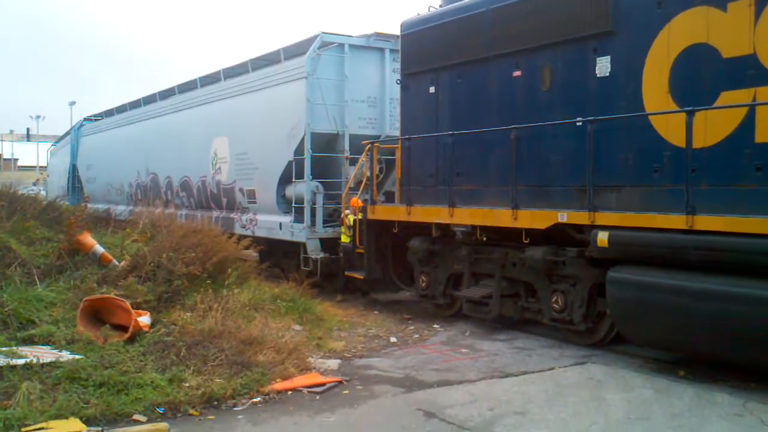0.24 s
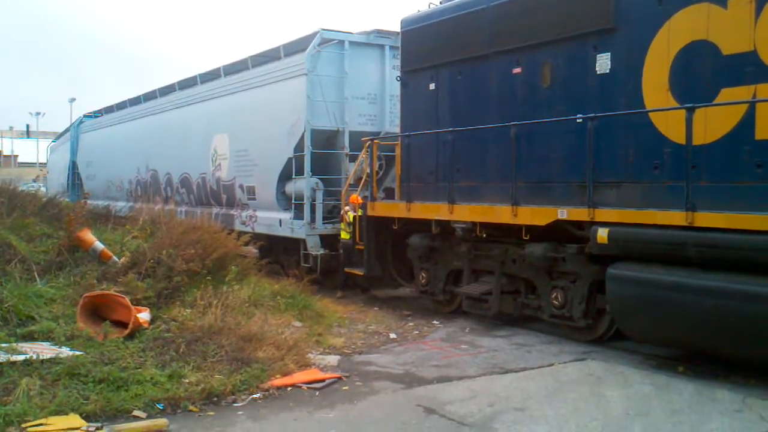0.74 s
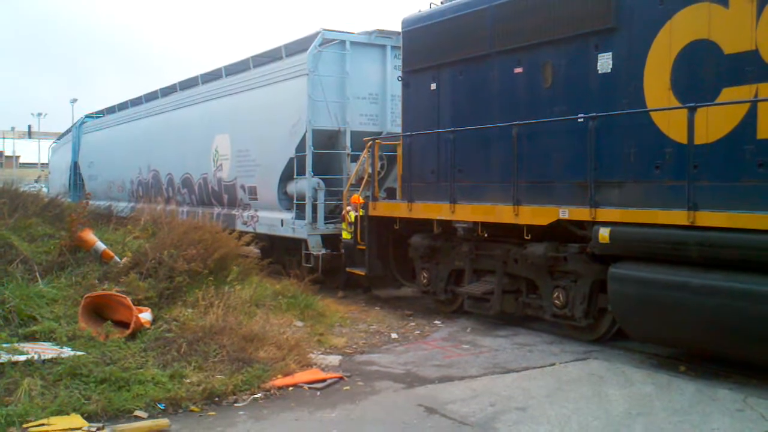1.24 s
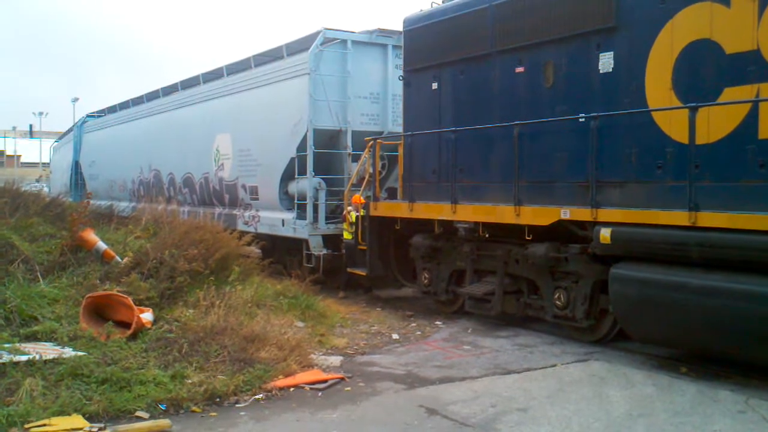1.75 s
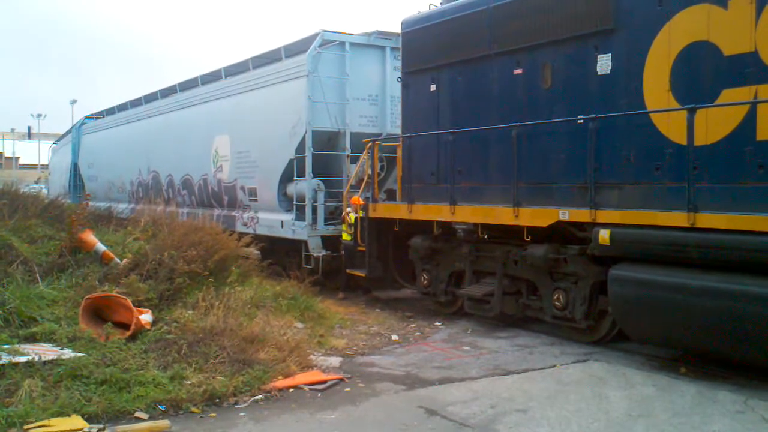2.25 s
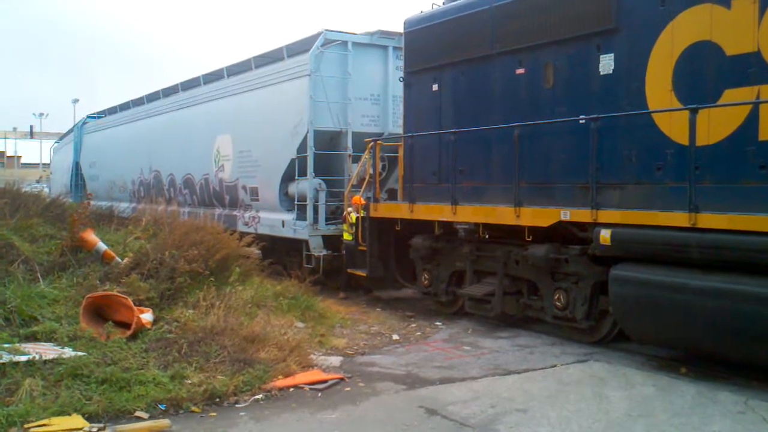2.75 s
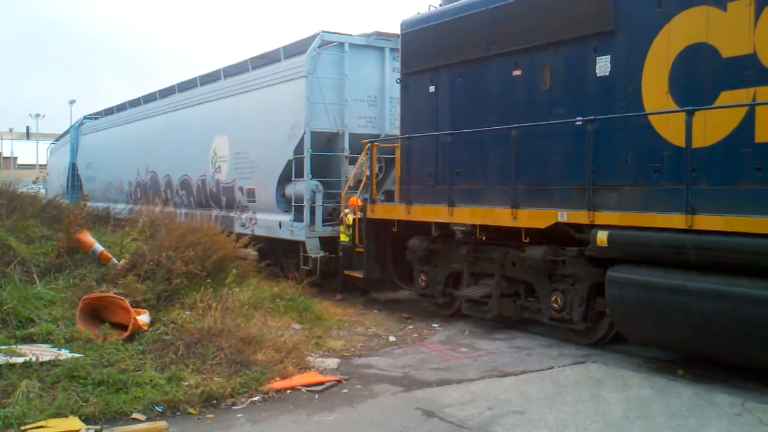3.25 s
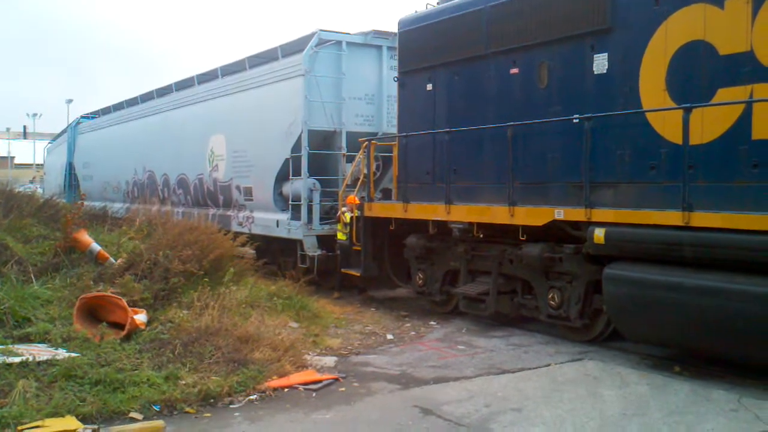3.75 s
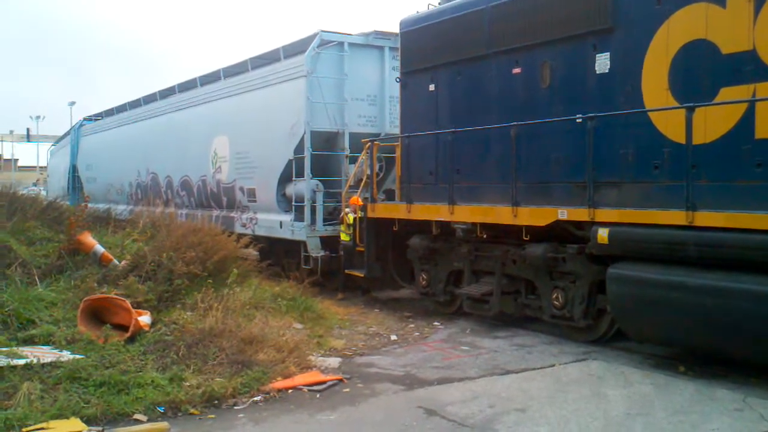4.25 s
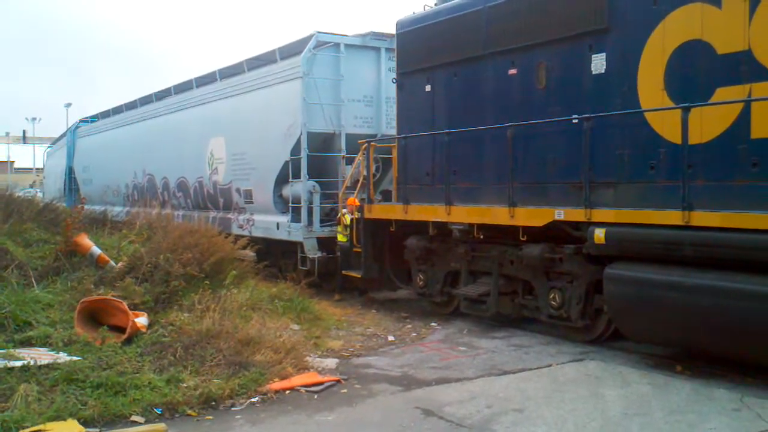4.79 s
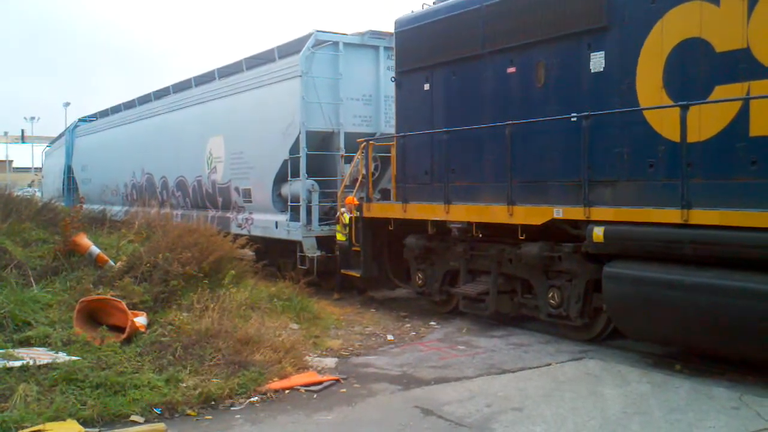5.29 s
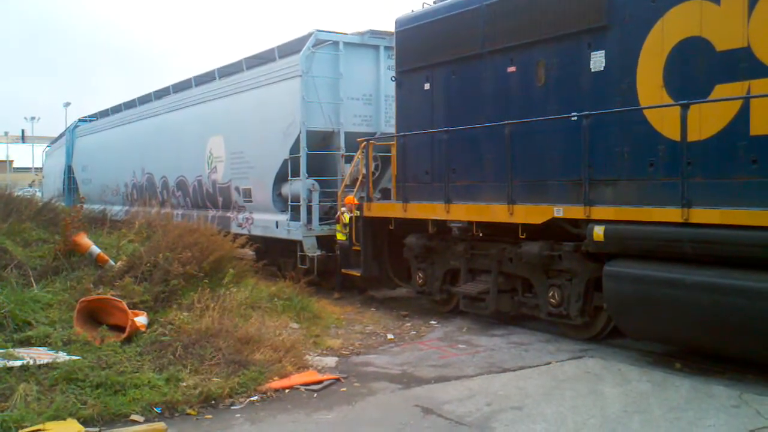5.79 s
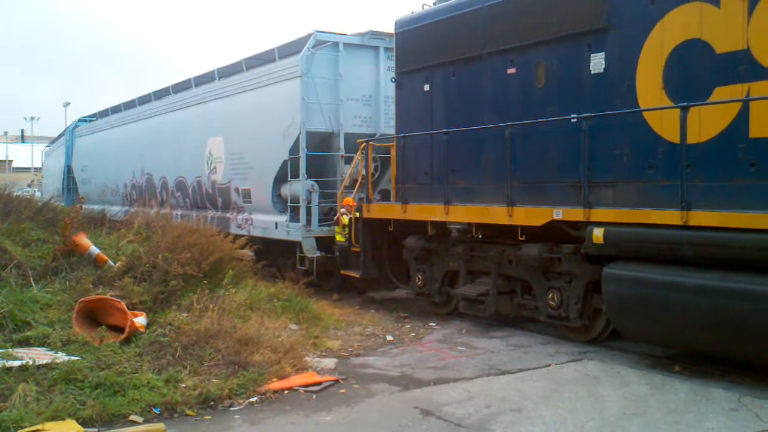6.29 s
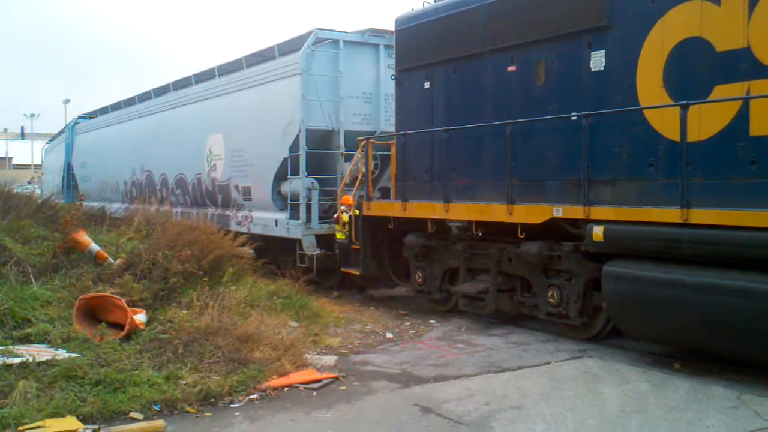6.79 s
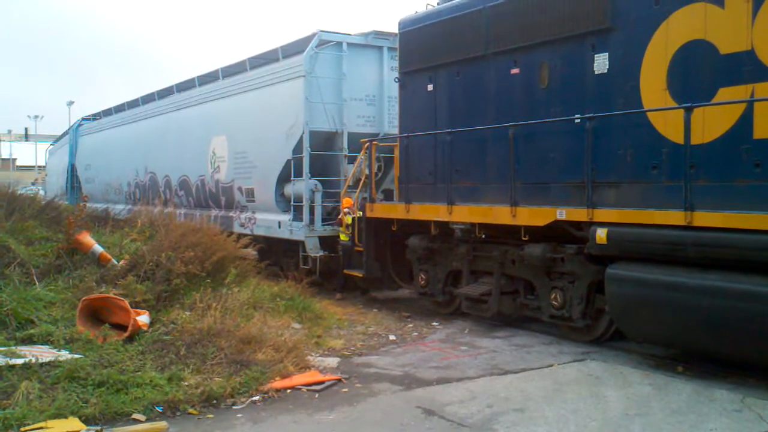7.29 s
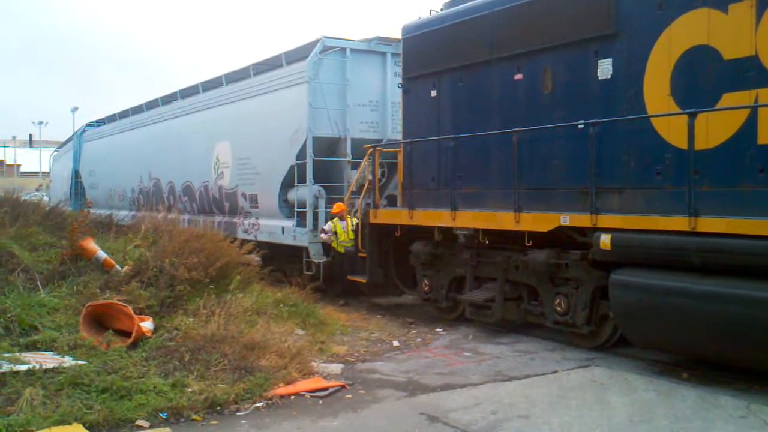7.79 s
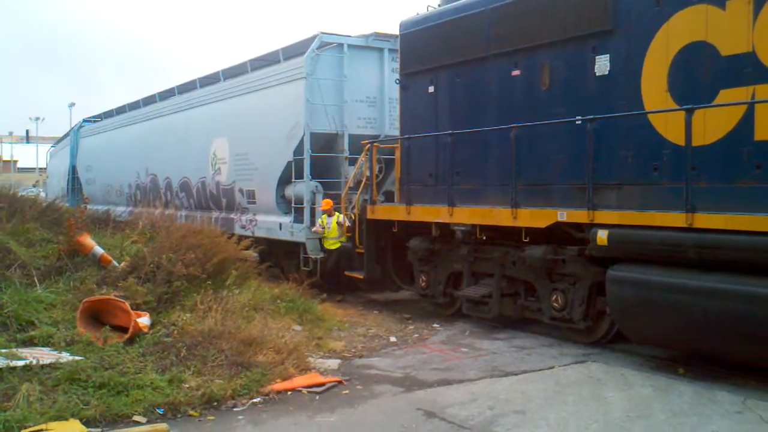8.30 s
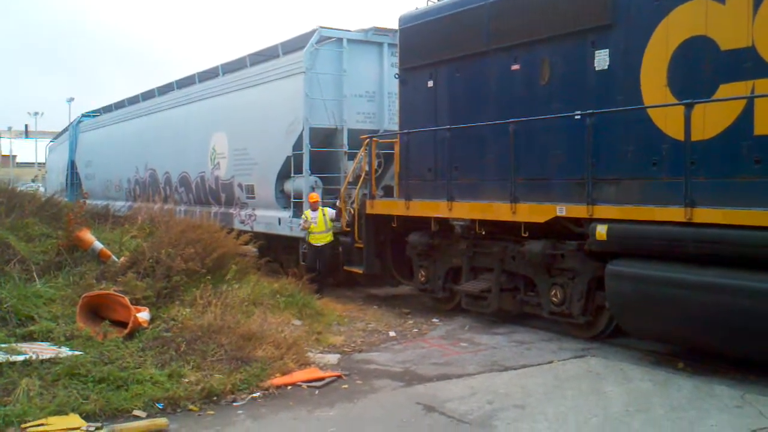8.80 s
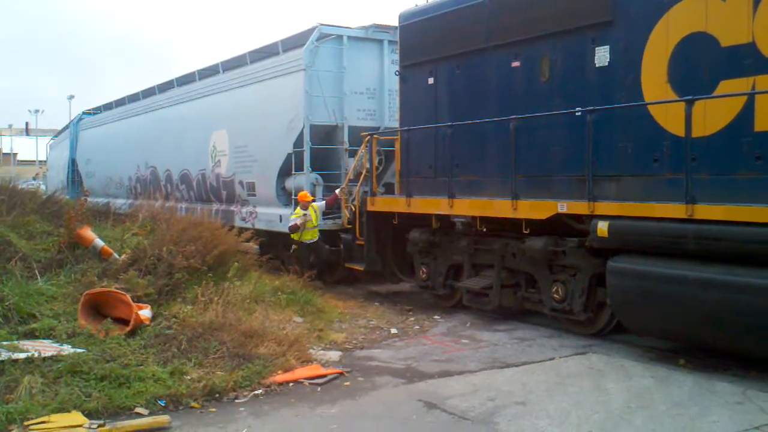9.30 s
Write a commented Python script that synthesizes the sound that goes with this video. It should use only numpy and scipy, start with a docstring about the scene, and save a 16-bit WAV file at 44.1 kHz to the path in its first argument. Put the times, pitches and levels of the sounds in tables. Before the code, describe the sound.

Steady locomotive idle, heard in stereo from a few metres away in an open yard, rough and throbbing with a piercing mid-high gear whine, faint whistles and hissing fans. Past the middle, a loud snap of compressed air bursts out and echoes off the cars. The whole sound ducks at once and gradually builds again, with one tiny air spit before the blast and one after.

```python
"""Idling locomotive and brake air

A diesel locomotive idles close by in a yard: recurring noise bursts and gliding rings make the
chug, steady and fluttering tones the hums, whine and whistles, shaped noise the cooling air.
A short, fierce burst of brake air, noise with flares and an echo, escapes; two faint spits of air
are heard as well. A gain control ducks the whole scene at the burst and lets it swell back slowly."""
import sys
import numpy as np
from scipy import signal
from scipy.fft import rfft, irfft
from scipy.io import wavfile

SR = 44100
rng = np.random.default_rng(int(sys.argv[2]) if len(sys.argv) > 2 else 0)


def waveform_to_disk(signal):
    """Save audio, clipped to [-1, 1], as 16-bit WAV at the path in sys.argv[1]."""
    frames = np.transpose(np.atleast_2d(signal))
    scaled = np.clip(frames, -1, 1) * 32767
    samples = np.round(scaled).astype(np.int16)
    wavfile.write(sys.argv[1], SR, samples)


N = 420713
TIME, BINS = np.arange(N) / SR, np.fft.rfftfreq(N, 1 / SR)  # s, Hz
CYCLE_HZ, CYLINDERS = 5.4038, 16  # mean crank turns per second; one stroke each per turn


def gain_of(db):
    """Logarithmic level: decibels become an amplitude factor."""
    return 10 ** (np.asarray(db) / 20)


def evened(x):
    """Normalization: scales a signal to rms 1."""
    return x / np.sqrt(np.mean(abs(x) ** 2) + 1e-20)


def read(points, hz):
    """Spectral interpolation: reads a table on a log-frequency axis."""
    f, value = np.transpose(points)
    return np.interp(np.log(hz + 1), np.log(f + 1), value)


def read_over_time(points):
    """Temporal interpolation: reads a table of times and values at every sample."""
    return np.interp(TIME, *np.transpose(points))


def drift(hz, size=20000):
    """Low-rate random modulation: joined random points, rms 1, wavering at up to about hz."""
    return evened(np.interp(TIME * 2 * hz, np.arange(size), rng.standard_normal(size)))


def flutter(share, hz):
    """Random complex modulation of mean power near 1: a share (0-1) of the amplitude wavers."""
    share = np.clip(share, 0, 1)
    wavering = evened(drift(hz) + 1j * drift(hz))
    return np.sqrt(1 - share ** 2) + share * wavering


# Delay of the right microphone port behind the left: pitch_hz, phase_rad
PORT_LAG = [(30, -2.6), (70, -.8), (200, -.8), (400, -.55), (850, -.6), (1300, 0), (1650, .7), (2620, 3.14),
            (13000, 28.27), (14100, 31)]


def lag(hz):
    """Interaural-style phase difference: radians by which the right port trails."""
    return np.interp(hz, *np.transpose(PORT_LAG))


# Level difference of the ports, the bass leaning left: pitch_hz, left_minus_right_db
LEAN = [(40, 1), (90, 2), (160, 6.5), (300, 4.5), (500, 2.5), (750, 3.5), (1100, 1), (2000, 1), (2600, 0),
        (6000, 0)]
# Coherence of the two ports: pitch_hz, likeness (0-1)
COHERENCE = [(40, .7), (130, .6), (300, .85), (600, .95), (1300, .98), (2000, .92), (2400, .99),
             (2550, .9998), (2750, .9998), (3200, .8), (4000, .85), (7000, .6), (13000, .45)]


def ports(pair, colour, likeness=COHERENCE):
    """Partial coherence: two unrelated signals are coloured and blended into two ports, rms 1."""
    a, b = rfft(pair)
    same = np.clip(read(likeness, BINS), 0, 1)
    lean = gain_of(read(LEAN, BINS) / 2)
    right = (same * a + np.sqrt(1 - same ** 2) * b) * np.exp(-1j * lag(BINS))
    spectra = np.array([a * lean, right / lean]) * gain_of(read(colour, BINS))
    return evened(irfft(spectra, N))


def coloured_noise(colour, likeness=COHERENCE):
    """Turbulence noise: white noise takes a spectral colour at the two ports."""
    return ports(rng.standard_normal((2, N)), colour, likeness)


def placed(wave, lean_db, radians):
    """Level and phase panning: a complex tone becomes two real port signals."""
    lean = gain_of(lean_db / 2)
    left = wave.real * (np.sqrt(2) * lean)
    right = (wave * (np.sqrt(2) * np.exp(-1j * radians) / lean)).real
    return np.array([left, right])


def tone(hz, wave):
    """Common direction: a complex tone takes the port differences that belong to its pitch."""
    return placed(wave, read(LEAN, hz), lag(hz))


def stroke_strength(turn, pulse=0.21, lope_db=0.14, lope_place=0.18):
    """Periodic excitation: one pulse per cylinder, strongest at one place in the crank turn."""
    lope = gain_of(lope_db * np.cos(2 * np.pi * (turn - lope_place)))
    return lope * (1 + pulse * np.cos(2 * np.pi * CYLINDERS * turn))


# Colour of exhaust and engine body: pitch_hz, relative level_db per Hz
EXHAUST = [(12, -50), (30, -31), (60, -21), (110, -7), (160, -4.5), (210, -7), (300, 0), (380, -5.3),
           (550, -3.3), (820, -5), (950, -8), (1090, -6.5), (1350, -11), (1650, -7.5), (1810, -12.5),
           (1970, -7), (2200, -13.5), (2500, -23), (3500, -50)]
# Share of the engine's power that repeats with each turn: pitch_hz, share (0-1)
REPEATS = [(40, .5), (130, .55), (300, .55), (450, .2), (700, .2), (900, .5), (1300, .45), (2200, .25)]


def engine(crank, level_db=-27.0, size=8192):
    """Cyclic excitation: bursts that return with every crank turn mix with fresh turbulence."""
    turn = np.arange(size) / size
    strokes = stroke_strength(turn)
    orders = rfft(rng.standard_normal((2, size)) * strokes)
    bursts = irfft(orders / np.sqrt(abs(orders)))  # makes the crank orders more even in strength
    steady = evened(np.array([np.interp(crank % 1, turn, b) for b in bursts]))
    fresh = evened(rng.standard_normal((2, N)) * np.interp(crank % 1, turn, strokes))
    share = read(REPEATS, BINS)
    drive = irfft(rfft(steady) * np.sqrt(share) + rfft(fresh) * np.sqrt(1 - share), N)
    return gain_of(level_db) * ports(drive, EXHAUST)


# Knocks and booms that the strokes ring in the exhaust, once a turn:
# place in the turn (0-1), pitch_hz at the centre, peak level_db before the port gain,
# glide_hz_per_s, half_length_s (to 1/e)
BOOMS = [(.04, 510, -28.5, -6000, .005), (.08, 660, -27, 0, .004), (.085, 380, -29, -9000, .005),
         (.155, 835, -28.5, 0, .004), (.16, 600, -20.5, 0, .0022), (.232, 835, -27.5, 0, .005),
         (.232, 570, -26, 0, .0022), (.275, 600, -29, 0, .004), (.322, 520, -25, 0, .005),
         (.365, 500, -28.5, 0, .004), (.41, 285, -32, 0, .008), (.452, 490, -25, 0, .0025),
         (.485, 550, -24, 0, .0035), (.487, 810, -30.5, 0, .004), (.572, 560, -26, 0, .002),
         (.605, 480, -24, -9000, .005), (.645, 430, -24, 0, .0025), (.68, 590, -22.5, 0, .003),
         (.707, 640, -23.5, 0, .004), (.732, 815, -29.5, 0, .005), (.782, 560, -27, 0, .003),
         (.86, 600, -26, 0, .0022), (.922, 710, -27, -9000, .005), (.955, 480, -30, 0, .003),
         (.99, 590, -23, 0, .004)]


def booms(crank, size=4096):
    """Impulsive resonance: short rings, some gliding, make the chug; no two turns are quite alike."""
    uneven = flutter(.18, 30)
    turn = np.arange(size) / size
    rings = 0
    for place, hz, db, glide, half_length in BOOMS:
        t = ((turn - place + .5) % 1 - .5) / CYCLE_HZ  # s from the centre of the ring
        cycles = hz * t + glide * t ** 2 / 2 + rng.random()
        rings = rings + gain_of(db) * np.exp(-(t / half_length) ** 2 + 2j * np.pi * cycles)
    centre_hz = np.mean([row[1] for row in BOOMS])  # all share one direction
    return tone(centre_hz, uneven * np.interp(crank % 1, turn, rings))


# Low hums of crank and auxiliaries; the two near 92 Hz beat slowly:
# pitch_hz, level_db before the swell, left_minus_right_db, right_lag_rad
HUMS = [(43.23, -57, 1, 3), (81.06, -55, -9, -2.4), (86.46, -55, 2, -2), (91.865, -43, 2, -1.1),
        (92.475, -45.2, 2, -1.1), (123.3, -50, 14, .3), (129.69, -46, 5, -.5), (162.1, -51, 14, -1.4),
        (180.8, -44.5, 1, -2.2), (259.4, -47, 8, -1.3), (263.4, -46.5, 8, -1.1), (286.4, -41.7, 5, -.9),
        (389.1, -44.5, 0, -1.5), (399.9, -47, -4, -1.4), (410.7, -45, -1, -.5), (443.1, -46, 7, -1.2)]
# Swell of the hums near 280 Hz, stronger late on: time_s, change_db at the centre pitch
DRONE_SWELL = [(0, -1), (4.5, -1), (5.3, 1), (6.5, 0.5), (7.5, 3.5), (9.5, 4)]


def hum(drone_hz=280, drone_width_hz=36):
    """Superposition and beating: slightly rough low tones, neighbours starting in opposite phase."""
    rough = flutter(.2, 14)
    swell_db = read_over_time(DRONE_SWELL)
    out = 0
    for k, (hz, db, lean_db, radians) in enumerate(HUMS):
        nearness = np.exp(-((hz - drone_hz) / drone_width_hz) ** 2)
        level = gain_of(db + swell_db * nearness)
        wave = (-1) ** k * level * rough * np.exp(2j * np.pi * hz * TIME)
        out = out + placed(wave, lean_db, radians)
    return out


# Gear and blower tones: pitch_hz at mean speed, level_db before the swell, flutter (0-1)
WHINES = [(599.5, -41.5, .3), (767.8, -44, .2), (779.7, -45.5, .3), (788.9, -44, .2), (832.2, -47, .2),
          (853.8, -40.8, .2), (1087, -53, .6), (1281, -45.5, .5), (1472, -37.6, .25), (1507, -50, .2),
          (1525.1, -31, .12), (1554, -50.5, .2), (1559.7, -41.5, .3), (1564.5, -48, .3), (1597, -49, .4),
          (1634, -45, .3), (1708, -53, .3), (1833, -54, .2), (1960, -52, .6), (2135, -56, .3),
          (2338, -48.5, .5), (2378, -59, .6), (2995, -52, .7), (3117, -58, .5), (3898, -65, .6)]
# Slight rise and fall of the whole whine: start_s, change_db
WHINE_SWELL = [(0, -2.5), (1.6, 0.5), (2.1, 1), (2.6, -0.8), (3.3, 2), (6.1, 1), (9.5, 2.5)]


def whine(wander=0.00025, flutter_width=.007):
    """Geared harmonic motion: tones share one shaft's speed; moving air flutters high ones faster."""
    shaft = np.cumsum(1 + wander * drift(1.201)) / SR
    out = 0
    for hz, db, share in WHINES:
        wave = flutter(share, flutter_width * hz) * np.exp(2j * np.pi * hz * shaft)
        out = out + tone(hz, gain_of(db) * wave)
    return gain_of(read_over_time(WHINE_SWELL)) * out


# High whistles of the blower: pitch_hz, level_db at the start, flutter (0-1), change_db_per_s
WHISTLES = [(4527, -57.5, 0.73, -0.16), (4590, -55.5, 0.61, -0.03), (6055, -53.5, 0.7, -.5),
            (7480, -57, .9, 0.3), (9180, -61.5, 0.77, -0.17), (10700, -70, .9, 0)]


def whistles(crank, throb=0.17, flutter_width=.006):
    """Amplitude modulation: blurred high tones throb with each crank turn; most slowly change level."""
    out = 0
    for hz, db, share, db_per_s in WHISTLES:
        pulse = 1 + throb * np.cos(2 * np.pi * (crank + rng.random()))
        wave = flutter(share, flutter_width * hz) * np.exp(2j * np.pi * hz * TIME)
        out = out + tone(hz, gain_of(db + db_per_s * TIME) * pulse * wave)
    return out


# Colour of the rushing cooling air: pitch_hz, relative level_db per Hz
HISS = [(2000, 5), (2600, 0.5), (3200, 9), (3900, 2.5), (5300, -2), (7000, 1.5), (9200, 0.5), (11000, -5),
        (12800, -7.5), (13700, -10)]
# Level of the cooling air before its flicker: start_s, level_db
HISS_LEVEL = [(0, -43), (2.5, -42.5), (4.3, -41), (6, -43), (9.5, -43)]


def fans():
    """Broadband flow noise: an even rush of cooling air with a faint quick flicker."""
    flicker_db = .3 * drift(15)
    return gain_of(read_over_time(HISS_LEVEL) + flicker_db) * coloured_noise(HISS)


# Faint spits of air: start_s, level_db of the hiss, t60_s
SPITS = [(3.771, -43, 0.45), (7.615, -38, 0.5)]
# Colour of the spits: pitch_hz, relative level_db per Hz
SPIT_COLOUR = [(1500, -17), (3000, 7), (5000, -17), (7500, 3), (9200, 5.5), (10500, -10), (14000, -15)]


def spits(rise_s=.012, puff_db=5, puff_t60=.09):
    """Exponential decay: each spit is a short puff, set relative to the longer hiss it starts."""
    strength = 0
    for s, db, t60 in SPITS:
        since = abs(TIME - s)
        fade = gain_of(-60 * since / t60) + gain_of(puff_db - 60 * since / puff_t60)
        strength = strength + np.clip((TIME - s) / rise_s + .5, 0, 1) * gain_of(db) * fade
    return strength * coloured_noise(SPIT_COLOUR)


OPEN_S, SHUT_S = 6.211, 6.303  # the brake valve opens and begins to shut


def valve(snap_s=0.0043, leak_s=.014, leak_db=-33, open_db=-14, full_db=-1.24, shut_t60=0.15):
    """Flow through an opening: a brief leak, a snap open, a swell, then a quick release."""
    leak = gain_of(leak_db) * ((TIME > OPEN_S - leak_s) & (TIME < OPEN_S + snap_s))
    opened = np.clip((TIME - OPEN_S) / snap_s, 0, 1)
    swell_db = np.interp(TIME, [OPEN_S, SHUT_S], [open_db, full_db])
    release_db = -60 * np.maximum(TIME - SHUT_S, 0) / shut_t60
    return leak + opened * gain_of(swell_db + release_db)


# Colour of the escaping air, with the resonances of its opening: pitch_hz, relative level_db per Hz
JET = [(400, -27), (1300, -1), (1950, 3.5), (2700, -14), (3400, -1), (4400, 0), (4800, 4), (5400, 5),
       (6600, 6), (7900, 6.5), (9200, 8.5), (9700, 8), (10400, 8.5), (11900, 3), (12500, 5), (13100, -1),
       (13700, 5.5)]


def brake_jet():
    """Jet turbulence: hard, sputtering noise follows the flow through the valve."""
    # coherence of the direct sound: pitch_hz, likeness (0-1)
    direct = [(2000, .95), (2450, .9998), (2900, .9998), (3500, .9), (9000, .8), (13000, .7)]
    sputter_db = .9 * drift(100) + 1.2 * drift(900)
    return valve() * gain_of(sputter_db) * coloured_noise(JET, direct)


# Colour of the echo: pitch_hz, relative level_db per Hz
ECHO_COLOUR = [(1300, -7), (2000, 8), (2700, -8), (3400, 8), (4600, 2), (5300, 1), (6600, 7), (7900, 6),
               (9200, 7), (10400, 3), (11600, 4), (12800, -4), (13700, 3)]


def brake_echo(build_s=0.033, level_db=-13, t60=0.48):
    """Diffuse scattering: the cars return a ragged echo, built up until just after the valve shuts."""
    ragged_db = 1.2 * drift(70)
    build = np.clip((TIME - OPEN_S) / (SHUT_S - OPEN_S + build_s), 0, 1)
    fade_db = level_db - 60 * np.maximum(TIME - SHUT_S, 0) / t60
    return build * gain_of(fade_db + ragged_db) * coloured_noise(ECHO_COLOUR)


# Flares inside the jet: centre_s, pitch_hz, width_hz, peak level_db
SPURTS = [(6.226, 10300, 1500, -19), (6.255, 11200, 1100, -12), (6.276, 6600, 704, -11.5),
          (6.299, 6400, 900, -14)]


def spurts(half_length_s=.005):
    """Narrow-band noise: brief flares of the jet, each in its own band."""
    out = 0
    for s, hz, width_hz, db in SPURTS:
        flare = gain_of(db) * np.exp(-((TIME - s) / half_length_s) ** 2)
        wave = flutter(1, width_hz / 2) * np.exp(2j * np.pi * hz * TIME)
        out = out + tone(hz, flare * wave)
    return out


def scene():
    """Superposition: the idling locomotive and the escaping air, on one wandering crank."""
    wander = .0004  # share of the crank speed
    crank = np.cumsum(CYCLE_HZ * (1 + wander * drift(1.491))) / SR  # turns
    locomotive = engine(crank) + booms(crank) + hum() + whine() + whistles(crank) + fans()
    air = spits() + brake_jet() + brake_echo() + spurts()
    return locomotive + air


# Colour of the faint self-noise: pitch_hz, relative level_db per Hz
SELF_NOISE = [(2600, -10), (3500, 6), (13500, -4)]


def record(dry, threshold_db=-18.0, attack_s=0.0089, fall_db_per_s=3.5, slope=0.96,
           self_noise_db=-64, edge_hz=14020):
    """Dynamic compression: gain ducks fast and recovers slowly; then self-noise and a low-pass."""
    r = np.exp(-1 / (attack_s * SR))
    power = signal.lfilter([1 - r], [1, -r], (dry ** 2).mean(0))
    power_db = 10 * np.log10(power + 1e-12)
    fall_db = TIME * fall_db_per_s
    held_db = np.maximum.accumulate(power_db + fall_db) - fall_db  # peaks sink at a steady rate
    over_db = np.maximum(held_db - threshold_db, 0)
    ducked = dry / gain_of(slope * over_db)
    noisy = ducked + gain_of(self_noise_db) * coloured_noise(SELF_NOISE)
    low_pass = signal.firwin(1023, edge_hz, window=("kaiser", 9), fs=SR)
    return signal.oaconvolve(noisy, low_pass[None], "same")


dry = scene()
out = record(dry)
waveform_to_disk(out)
```